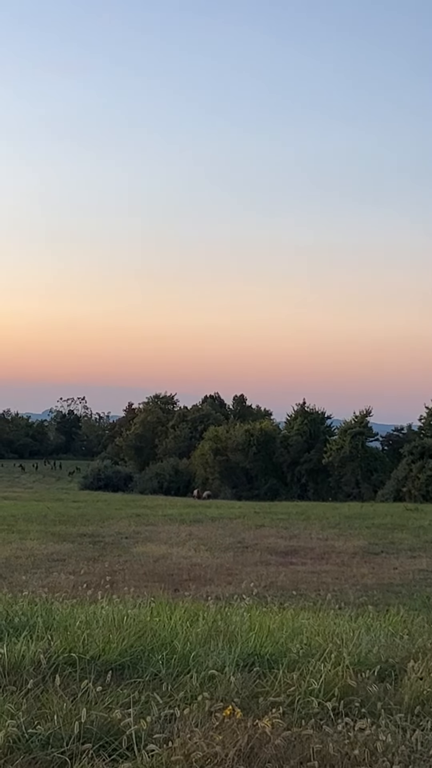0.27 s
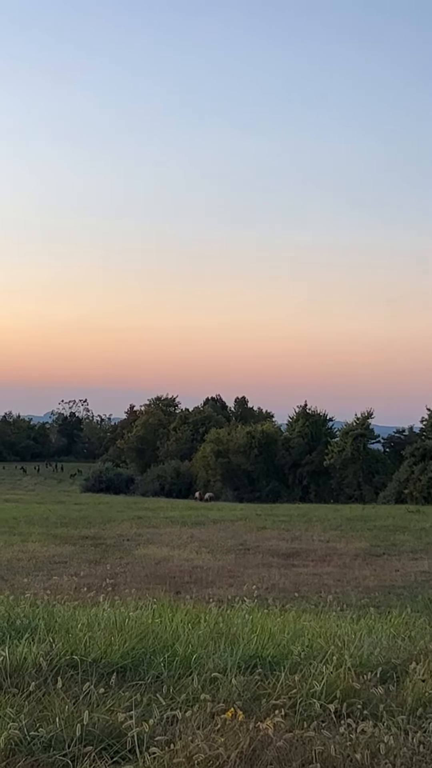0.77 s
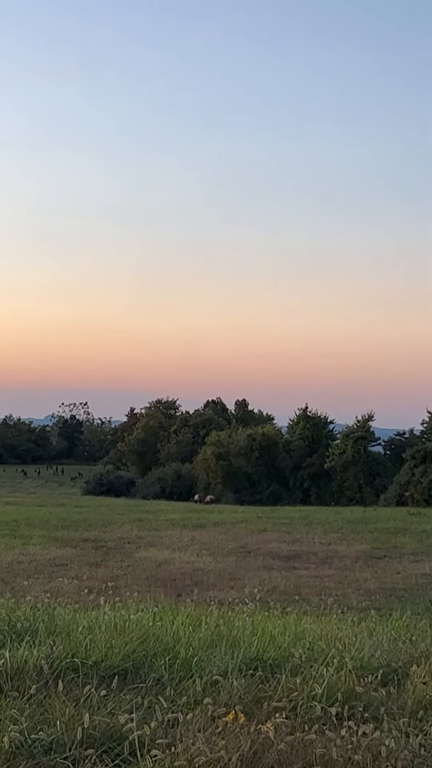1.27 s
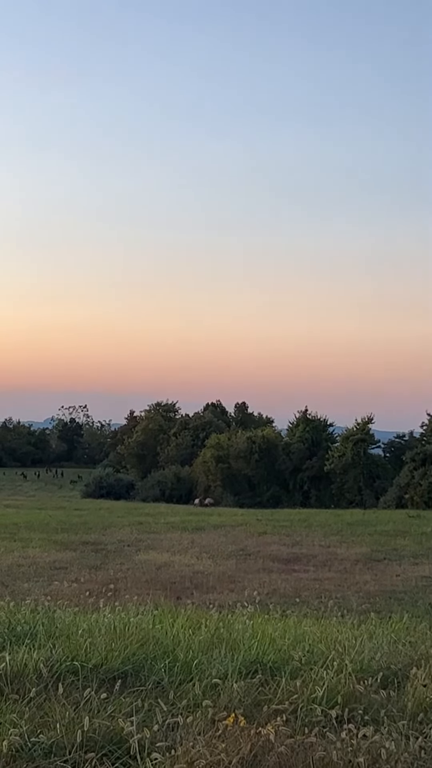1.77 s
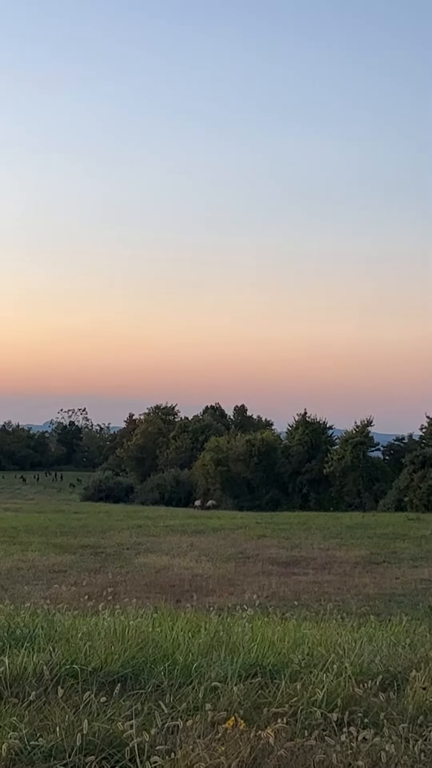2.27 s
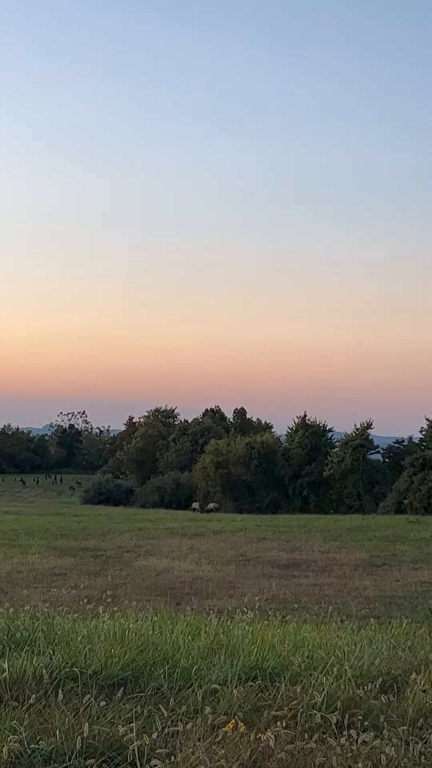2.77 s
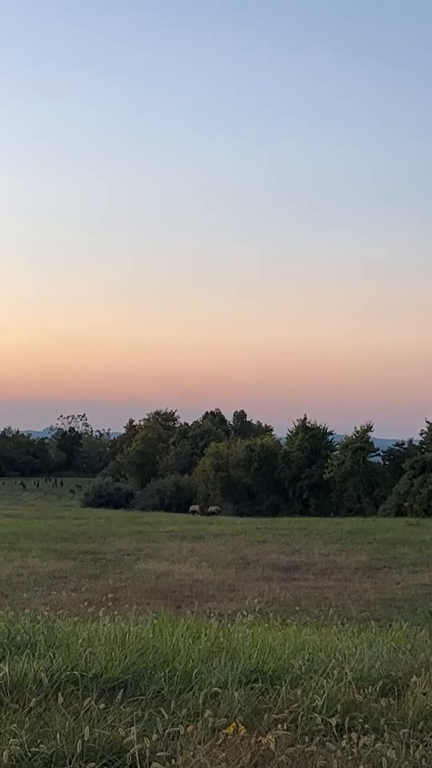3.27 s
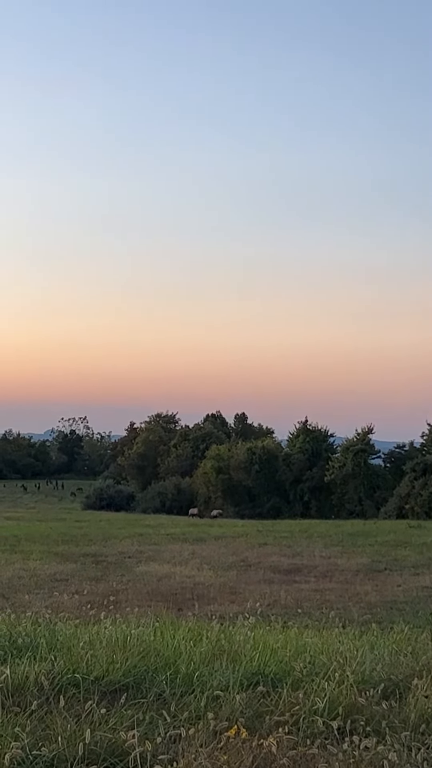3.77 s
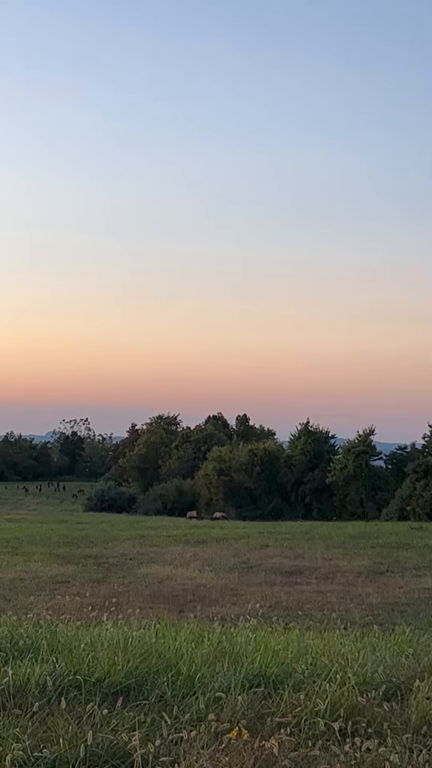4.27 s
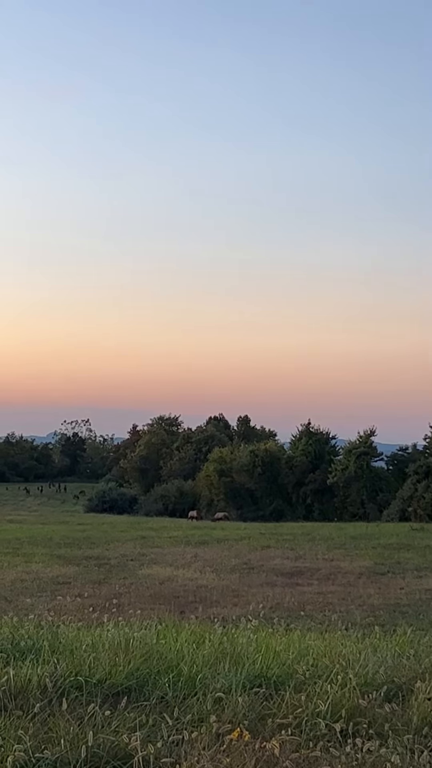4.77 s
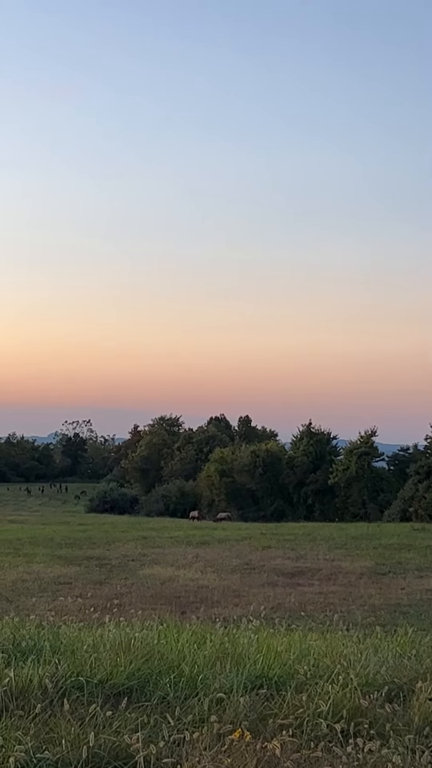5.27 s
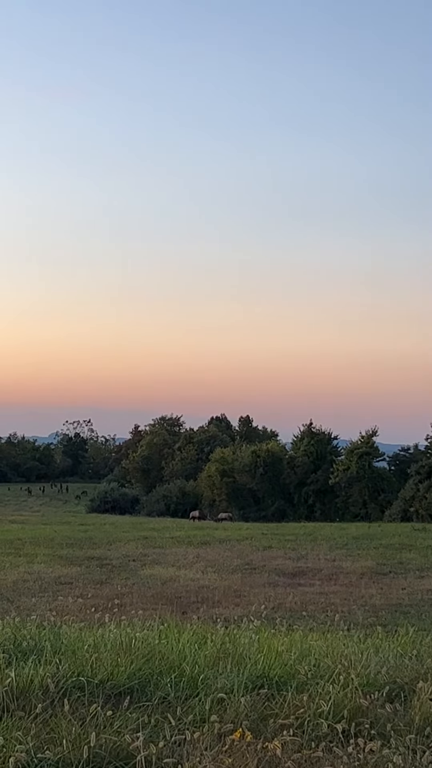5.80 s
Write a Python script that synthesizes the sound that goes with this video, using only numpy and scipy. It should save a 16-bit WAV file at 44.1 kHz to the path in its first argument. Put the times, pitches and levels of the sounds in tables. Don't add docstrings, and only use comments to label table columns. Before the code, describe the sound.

A quiet open field at dusk, heard by a handheld stereo microphone. Steady insects fill the high range, buzzing and throbbing about nineteen times a second, with cricket trill bouts around 4.2 kHz. At 0 s a deep case thump and a cracking antler clack land over hoarse, breathy distant elk calls and short thin whistles. A groan runs to 0.9 s with a brief snort near 0.75, a falling squeal follows at 1.0, then a nasal bellow around 1.3. From 1.7 to 2.5 antlers clatter in woody knocks, strongest near 2.0 and 2.25. A clear whistle rises 2.7-3.2 s. After a lull, a short falling lead-in at 4.1 precedes a louder climbing whistle, 4.3-4.7, flickering in strength, among antler rattles until about 4.9. A faint level whistle lingers from 5.3, with small knocks at 5.5. Dull thuds and finger taps recur, notably 0.6-1.1, 2.3-2.6 and 5.75. Trees return soft echoes.

```python
import sys
import numpy as np
from scipy import signal
from scipy.fft import rfft, irfft, next_fast_len
from scipy.io import wavfile
from scipy.ndimage import uniform_filter1d

SR = 44100
rng = np.random.default_rng(int(sys.argv[2]) if len(sys.argv) > 2 else 0)


def invert_db(level):
    return 10 ** (np.asarray(level, dtype=float) / 20)


def transcribe(signal):
    frames = np.atleast_2d(signal).T
    limited = np.clip(frames, -1, 1)
    pcm = np.round(limited * 32767).astype(np.int16)
    wavfile.write(sys.argv[1], SR, pcm)


N = 266275


def evened(x):
    return x / np.sqrt(np.mean(x ** 2) + 1e-20)


def read(points, hz):
    f, value = np.transpose(points)
    return np.interp(np.log(hz + 1), np.log(f + 1), value)


def played(rows):
    s, *columns = np.transpose(rows)
    t = np.arange(N) / SR
    gate = np.clip(np.minimum(t - s[0], s[-1] - t) / 0.0017, 0, 1)
    return gate, *(np.interp(t, s, c) for c in columns)


def coloured(db):
    hz = np.fft.rfftfreq(N, 1 / SR)
    return evened(irfft(rfft(rng.standard_normal(N)) * invert_db(db(hz)), N))


def resonate(x, hz, width_hz):
    turn = np.exp(2j * np.pi * np.cumsum(hz * np.ones(len(x))) / SR)
    r = np.exp(-np.pi * width_hz / SR)
    return 2 * (turn * signal.lfilter([1 - r], [1, -r], x / turn)).real


def partial(hz, db, rough, width_hz):
    rough = np.clip(rough, 0, 1)
    line = np.sqrt(2) * np.sin(2 * np.pi * np.cumsum(hz) / SR)
    noise = rng.standard_normal(len(hz))
    fuzz = evened(resonate(resonate(noise, hz, width_hz), hz, width_hz))
    return invert_db(db) * (np.sqrt(1 - rough) * line + np.sqrt(rough) * fuzz)


def voice(rows, rough, width_hz, multiples=(1,), overtones_db=(0,), waver_db=0, wobble=0.02):
    gate, hz, db, *mouth_db = played(rows)
    on, out = gate > 0, np.zeros(N)
    for k, rel_db in zip(multiples, overtones_db):
        waver = evened(uniform_filter1d(rng.standard_normal(on.sum()), 2500))
        level_db = db + rel_db + sum(mouth_db) * ((k == 4) - (k == 6))
        pitch_hz = k * hz[on] * (1 + rough * wobble * waver[::-1])
        out[on] += partial(pitch_hz, level_db[on] + waver_db * waver, rough, width_hz)
    return gate * out


def note(s, rise_s, fall_s, hz, db):
    edge_db, sag = -32, 0.011
    return [(s - rise_s, hz * (1 + sag / 2), db + edge_db),
            (s, hz, db),
            (s + fall_s, hz * (1 - sag / 2), db + edge_db)]


# time_s, pitch_hz, effort_db
GROAN = [(0.02, 1060, -90), (0.104, 1040, -80), (0.17, 1050, -61.5), (0.25, 1070, -68.5),
         (0.4, 1040, -62.5), (0.52, 1030, -70), (0.8, 1040, -77), (0.9, 1058, -66.5), (0.94, 1058, -94)]
GROAN_OVERTONES_DB = (-1, -26)


def groan():
    return invert_db(2.5) * voice(GROAN, 0.276, 23, range(1, 3), GROAN_OVERTONES_DB, waver_db=-1.0)


# time_s, pitch_hz, effort_db
SQUEAL = [(.9, 1142, -66), (.94, 1113, -55), (.97, 1041, -47.5), (1.0, 1007, -44), (1.03, 1003, -46.5),
          (1.08, 1028, -52.5), (1.11, 1018, -76), (1.25, 1027, -52)]
SQUEAL_OVERTONES_DB = (-2.5, -2, -26.5)


def squeal():
    return voice(SQUEAL, 0.24, 75, range(1, 4), SQUEAL_OVERTONES_DB, waver_db=3.5)


# time_s, pitch_hz, effort_db, mouth_opening_db (on the fourth partial)
BELLOW = [(1.0, 394, -73, 17), (1.12, 402.2, -63, 8), (1.2, 373.7, -55.5, 7), (1.255, 363.7, -56.5, 3.5),
          (1.31, 352, -44, -1), (1.365, 360.8, -44, -1.5), (1.432, 348, -53.5, -8), (1.46, 367.2, -61, 4),
          (1.52, 360.7, -55, -2), (1.72, 363, -70, 8.5)]
BELLOW_OVERTONES_DB = (-1, -9, 1, -7.5)


def bellow():
    return voice(BELLOW, 0.36, 85, (2, 3, 4, 6), BELLOW_OVERTONES_DB, waver_db=2.1)


# time_s, pitch_hz, level_db
SNORT = [(.72, 2515, -82), (.765, 2470, -51), (.81, 2400, -80)]


def snort():
    return voice(SNORT, rough=0.47, width_hz=730)


# time_s, level_db
RASP = [(0.0, -51.5), (0.714, -58.5), (0.984, -58.5), (1.15, -54), (1.724, -62), (1.9, -86)]
# freq_hz, gain_db
RASP_COLOUR = [(240, -100), (400, -25), (891, -15.5), (1050, -6), (1270, -13.5), (1490, -11), (1730, -11),
               (2120, -6.5), (2530, -14.5), (2620, -55), (2900, -69), (3050, -17), (3900, -34.5),
               (6600, -120)]


def rasp():
    gate, level_db = played(RASP)
    return gate * invert_db(level_db - 6.5) * coloured(lambda hz: read(RASP_COLOUR, hz))


# time_s, pitch_hz, effort_db
GRUNT = [(1.39, 1085, -53), (1.44, 954, -53), (1.49, 775, -62), (1.56, 754, -59)]
# peak_s, rise_s,
# fall_s, pitch_hz, peak_db
MOANS = [(.244, .2, .1, 2380, -61.5), (.3, .05, 1.2, 2370, -69), (.9, .06, .03, 2330, -56.5),
         (1.275, .1, .04, 1060, -44), (.38, .9, .3, 770, -73), (1.48, .22, .14, 620, -57),
         (1.25, .25, .02, 930, -59), (1.0, .02, .3, 930, -69), (4.4, 2.5, 3.0, 2135, -80),
         (4.82, .2, .13, 297, -75), (5.0, .13, .12, 290, -70.5), (.43, .06, .2, 2072, -46),
         (1.03, .08, .12, 1065, -46), (1.06, .1, .04, 1550, -54), (.5, .2, .12, 1480, -61),
         (.72, .1, .08, 1400, -60), (.81, .05, .05, 1490, -60), (.86, .04, .05, 1380, -61),
         (.61, .05, .03, 1250, -60), (4.64, .03, .17, 1960, -47), (1.42, .12, .08, 1090, -48),
         (1.5, .1, .15, 1230, -58), (1.35, .15, .15, 870, -57), (1.53, .08, .1, 900, -56),
         (1.1, .15, .2, 660, -62), (1.05, .1, .15, 1380, -60), (1.64, .04, .05, 1170, -59),
         (.03, .05, .15, 2060, -54), (.85, .3, .1, 2340, -60), (.25, .2, .3, 1500, -63)]


def far_voices():
    calls = [GRUNT] + [note(*row) for row in MOANS]
    return sum(voice(rows, rough=0.42, width_hz=94) for rows in calls)


# time_s, share of the calls that is thinned
HOLLOW = [(0, .25), (.95, .5), (1.15, 1), (1.75, 1), (1.9, 0), (6.04, 0)]


def elk():
    herd = far_voices() + snort() + rasp() + groan() + squeal() + bellow()
    hollow_share = played(HOLLOW)[1]
    notch = signal.iirnotch(1780, 4.5, SR)
    hollowed = signal.filtfilt(*notch, signal.lfilter(*notch, herd))
    return (1 - hollow_share) * herd + hollow_share * hollowed


# time_s, pitch_hz, effort_db
BUGLES = [
    [(2.715, 1740, -76), (2.74, 1795, -55), (2.775, 1813, -47.5), (2.845, 1853, -48.5), (2.91, 1845, -51),
     (3.06, 1867, -44), (3.1, 1867, -46.5), (3.14, 1867, -61), (3.3, 1866, -88)],
    [(4.05, 1890, -78), (4.115, 1805, -60), (4.16, 1760, -62), (4.19, 1750, -74)],
    [(4.292, 1740, -70), (4.317, 1765, -37.5), (4.385, 1845, -44.5), (4.497, 1860, -44.5),
     (4.55, 1965, -37.5), (4.59, 1990, -44), (4.613, 1930, -39), (4.621, 1890, -54), (4.72, 1850, -70)],
    [(5.26, 2110, -87), (5.352, 2084, -64.5), (5.506, 2072, -62.5), (6.038, 2065, -63)],
    [(0.0, 2340, -50), (0.05, 2403, -61.5), (0.13, 2450, -53), (0.15, 2410, -66), (0.2, 2330, -89)],
    [(.372, 2024, -82), (.385, 1997, -55.5), (.45, 2000, -56), (.482, 1975, -56), (.5, 2010, -81),
     (.55, 2010, -74)],
]
# time_s, depth_db, half_width_s
FADES = [(2.805, 24, .013), (2.815, 8, .03), (2.945, 7, .025), (4.346, 4, .008), (4.362, 4, .007),
         (4.377, 9, .007), (4.39, 14, .009), (4.423, 12, .012), (4.45, 6, .016), (4.497, 3, .012),
         (4.527, 8, .014), (4.561, 3, .007), (4.58, 5, .014), (5.46, 10, .06), (5.742, 8, .04),
         (5.946, 25, .065)]
# peak_s, rise_s, fall_s, pitch_hz, peak_db
PIPES = [(.212, .07, .07, 2234, -56.5), (.488, .2, .04, 2226, -60), (.736, .3, .12, 2200, -61.5),
         (.392, .02, .1, 1935, -56), (.7, .2, .2, 2075, -63), (.68, .06, .04, 1160, -62),
         (.72, .02, .02, 1060, -60), (.47, .15, .1, 750, -66), (.606, .015, .3, 2025, -60.5),
         (4.992, .18, .05, 948, -69.5), (5.564, .02, .04, 1345, -57.5)]


def whistles():
    t = np.arange(N) / SR
    fade_db = sum(db * np.maximum(1 - abs(t - s) / half_s, 0) for s, db, half_s in FADES)
    bugles = sum(voice(rows, rough=0.02, width_hz=90) for rows in BUGLES)
    pipes = sum(voice(note(*row), rough=0.08, width_hz=140) for row in PIPES)
    return bugles / invert_db(fade_db) + pipes


# freq_hz, width_hz, gain_db
ANTLER = [(805, 840, -4), (1127, 410, -3.5), (1778, 480, -3.5)]


def bone(x):
    return sum(invert_db(g) * resonate(resonate(x, f, w), f, 2 * w) for f, w, g in ANTLER)


# freq_hz, width_hz, gain_db
CRACK = [(3050, 890, 18), (4200, 2700, 8)]
# start_s, peak_db, ring_hz, brightness_db, chatter_t60_s
BLOWS = [(0.0435, -27.5, 1340, -17.5, 0.057), (0.052, -36, 1030, -31, 0.048),
         (0.072, -36, 1220, -23.5, 0.084), (0.107, -41, 1390, -20, 0.037), (0.116, -41.5, 1280, -26, 0.046),
         (1.721, -44, 1100, -28, 0.094), (1.729, -44, 1294, -25, 0.1), (1.914, -38.5, 1115, -18.5, 0.073),
         (1.926, -31, 860, -38, 0.053), (1.939, -41, 920, -34, 0.24), (1.961, -42, 1130, -30, 0.12),
         (1.992, -38, 1220, -35, 0.021), (1.997, -37.5, 850, -22, 0.039), (2.016, -48, 980, -25, 0.11),
         (2.035, -35.5, 1010, -31, 0.018), (2.038, -28.5, 1103, -19.5, 0.076),
         (2.056, -40, 1130, -20, 0.032), (2.064, -38, 1080, -35, 0.088), (2.08, -46, 1120, -31, 0.061),
         (2.142, -46.5, 1020, -34, 0.055), (2.153, -47.5, 980, -26, 0.19), (2.178, -51, 1160, -23, 0.069),
         (2.186, -43, 1120, -37, 0.13), (2.238, -39, 1310, -10, 0.019), (2.24, -26.5, 970, -55, 0.031),
         (2.2505, -26.5, 1150, -70, 0.0071), (2.254, -38, 780, -63, 0.06), (2.268, -52, 1200, -30, 0.037),
         (2.33, -63, 770, -8, 0.095), (2.42, -56, 890, -17, 0.29), (2.442, -53.5, 726, -18, 0.25),
         (3.806, -63.5, 990, -17, 0.083), (3.865, -61.5, 1160, -29, 0.055),
          (3.968, -59.5, 880, -32, 0.035), (4.11, -58, 1150, -39, 0.062), (4.202, -48.5, 1150, -26, 0.11),
          (4.228, -50.5, 846, -22, 0.18), (4.262, -50, 930, -6.5, 0.045), (4.266, -44.5, 1220, -23, 0.031),
          (4.334, -42, 1150, -8.5, 0.081), (4.371, -45.5, 1340, -27, 0.087), (4.435, -45, 1290, -35, 0.1),
          (4.488, -52, 824, -30, 0.072), (4.516, -46.5, 845, -33, 0.066), (4.589, -67, 818, -28, .06),
          (4.609, -46, 1210, -26, 0.049), (4.614, -49.5, 845, -34, 0.15), (4.632, -37.5, 920, -33, 0.16),
          (4.646, -46.5, 1530, -12, 0.012), (4.652, -38.5, 1200, -21.5, 0.048),
          (4.669, -63, 1500, -28, 0.031), (4.738, -45, 993, -22, 0.036), (4.744, -48.5, 870, -39, 0.16),
          (4.757, -62, 1190, -28, .05), (4.79, -50, 1080, -13, 0.057), (4.796, -47, 1020, -32, 0.065),
          (4.833, -51, 970, -27, 0.074), (4.841, -48, 990, -36, 0.041), (5.5, -56, 1160, -20, 0.12),
          (5.518, -54, 1170, -18, 0.063), (5.552, -51.5, 1310, -12.5, 0.23)]


def antler_blows():
    knock_rise_s, crack_t60_s = 0.0027, 0.036
    out, t = np.zeros(N + 6000), np.arange(6000) / SR
    for s, db, hz, bright_db, t60_s in BLOWS:
        size, chance, hiss = rng.random((3, 6000)) - 0.5
        knocks = np.sign(size) * (0.5 + abs(size)) * (chance < 2500 / SR - 0.5)
        knocks[:30:12] = 2.2
        chatter = knocks * np.minimum(t / knock_rise_s + 0.33, 1) * invert_db(-60 * t / max(t60_s, 0.005))
        edge = (knocks + 7.8 * hiss) * invert_db(-60 * t / crack_t60_s)
        ring = 2.2 * resonate(resonate(chatter, hz, 190), hz, 910) + bone(chatter)
        ring = signal.lfilter(*signal.butter(2, 1900, fs=SR), ring)
        crack = sum(invert_db(g) * resonate(resonate(edge, f, w), f, w) for f, w, g in CRACK)
        blow = ring / abs(ring).max() + invert_db(bright_db + 13.0) * crack / abs(crack).max()
        out[round(s * SR):][:6000] += invert_db(db) * blow
    return out[:N]


# peak_s, rise_s, fall_s, peak_db
RATTLE = [
    (1.93, 0.043, 0.2, -73),
    (2.087, 0.13, 0.06, -58),
    (2.304, 0.73, 0.83, -64),
    (4.347, 0.6, 0.4, -57.5),
    (4.638, 0.085, 0.37, -51.5),
    (5.686, 0.28, 0.23, -71),
]


def antler_rattle():
    knocks = rng.standard_normal(N) * (rng.random(N) < 700 / SR)
    loose, out = evened(bone(knocks)), np.zeros(N)
    for s, rise_s, fall_s, peak_db in RATTLE:
        gate, _, db = played(note(s, rise_s, fall_s, 0, peak_db))
        out += gate * invert_db(db - 3.0) * loose
    return out


def antlers():
    band = signal.butter(4, [580, 5400], "band", fs=SR, output="sos")
    return signal.sosfilt(band, antler_blows() + antler_rattle())


def tree_line(x):
    t = np.arange(SR // 2) / SR
    hits = rng.standard_normal(len(t)) * (rng.random(len(t)) < 500 / SR)
    echoes = hits * invert_db(-60 * t / 0.67) * (t > 0.012)
    dull = signal.lfilter([0.35], [1, -0.65], x)
    return signal.fftconvolve(dull, echoes / np.linalg.norm(echoes))[:N]


# time_s, factor on the throb depth
IN_STEP = [(0, .4), (1.2, .6), (3.0, 1.6), (4.1, .8), (6.04, 1.0)]


def choir(db, low_hz, peak_hz, high_hz, rate_hz, first_s, depth_db):
    corners_hz = [0, low_hz - 450, low_hz, peak_hz, high_hz, high_hz + 750, SR / 2]
    gains_db = [-99.0, -52.0, -5.5, 3.5, -2.0, -47, -150]
    band = coloured(lambda hz: np.interp(hz, corners_hz, gains_db))
    beat = np.cos(2 * np.pi * rate_hz * (np.arange(N) / SR - first_s))
    drift = evened(uniform_filter1d(rng.standard_normal(N), 1200))
    return invert_db(db + 1.68 * drift + depth_db * played(IN_STEP)[1] * beat) * band


# low_hz, peak_hz, high_hz, throb_rate_hz, first_throb_s, throb_depth_db
CHOIRS = [
    (5600, 5960, 6350, 19.1, .024, 2.6),
    (4420, 4980, 6800, 61.0, .0, 1.3),
    (10950, 11600, 12250, 19.02, .012, 2.8),
    (12300, 15200, 17500, 19.35, .025, 2.4),
    (8950, 9250, 13000, 19.0, .0, .6),
    (3750, 4150, 4250, 38.0, .0, 1.5),
    (7150, 7280, 7350, 9.5, .0, 5),
]
CHOIR_DB = [-55.5, -58, -75, -77.5, -84.5, -69, -88]
# time_s, gain_db
HIGH_SWELL = [(0, 6.5), (4.4, 3), (4.9, 9), (6.04, 9)]
# time_s, gain_db
THIN_SWELL = [(0, 1), (2.3, 3), (4.2, 4.5), (4.4, 7.5), (6.04, 8)]


def insects():
    choirs = [choir(db, *row) for db, row in zip(CHOIR_DB, CHOIRS)]
    highest = choirs[3] * invert_db(played(HIGH_SWELL)[1])
    thin = choirs[4] * invert_db(played(THIN_SWELL)[1])
    return sum(choirs[:3] + choirs[5:]) + highest + thin


# start_s, end_s, pitch_hz, level_db
CRICKET = [
    (.1, 0.333, 4200, -67.5),
    (0.624, 0.95, 4182, -62),
    (1.399, 1.751, 4254, -64),
    (1.8, 2.266, 4200, -74),
    (2.58, 3.074, 4170, -65.5),
    (3.1, 3.528, 4200, -72),
    (3.552, 3.883, 4216, -64.5),
    (4.854, 5.347, 4193, -63),
]


def cricket():
    pulses = evened(1 + 0.35 * np.sin(2 * np.pi * 38.2 * np.arange(N) / SR))
    out = np.zeros(N)
    for start_s, end_s, hz, db in CRICKET:
        bout = [(start_s - 0.04, hz, db - 7), (start_s + 0.08, hz, db - 1),
                (end_s - 0.06, hz + 25, db), (end_s + 0.03, hz + 25, db - 9)]
        out += voice(bout, rough=0.7, width_hz=110, wobble=0.002)
    return pulses * out


# peak_s, peak_db, hold_s, scuff_db (against the thud)
BUMPS = [(0.0, -26, 0, -46), (0.174, -53.5, 0, -34), (0.662, -52.5, 0.1, -17.5),
         (0.837, -48.5, 0.0054, -30), (0.916, -50, 0.025, -10), (1.061, -45, 0.0088, -19),
         (1.392, -59.5, 0, -41), (1.568, -64, 0.049, -10.5), (1.864, -63, 0.0085, -25),
         (1.942, -74.5, 0.13, 6.5), (2.309, -50, 0.0046, -11.5), (2.42, -48, 0.0036, -26),
         (2.518, -51.5, 0.013, -10), (2.658, -54, 0, -32), (3.137, -47, 0, -20), (3.2, -63.5, 0.066, -32),
         (3.482, -62.5, 0.0094, -11), (3.8, -58.5, 0, -10), (4.198, -66, 0.014, -19),
         (5.02, -64, 0.16, -20), (5.285, -61.5, 0.09, -25), (5.516, -61.5, 0.092, -7),
         (5.728, -38, 0.12, -37), (5.939, -48.5, 0, -39), (6.03, -57, 0, -33)]
# freq_hz, gain_db
BUMP_COLOUR = [(20, -50), (33, -5), (52, 4), (75, -1), (110, -6.5), (160, -29.5), (250, -57.5), (700, -120)]
# freq_hz, gain_db
SCUFF_COLOUR = [(90, -25), (140, 5.5), (200, -13.5), (350, -19), (500, -60), (1500, -110)]
# time_s, level_db
BREEZE = [(0, -59), (.5, -72), (1.3, -73), (2.2, -72.5), (2.75, -78), (3.3, -68), (4.3, -69.5),
          (5.2, -64.5), (6.04, -78)]


def bumps():
    rise_db_s, fall_db_s, breeze_scuff_db = 232, 348, -8.5
    t, breeze = np.arange(N) / SR, invert_db(played(BREEZE)[1])
    push, rub = breeze ** 2, (invert_db(breeze_scuff_db) * breeze) ** 2
    for s, db, hold_s, scuff_db in BUMPS:
        before_db = rise_db_s * np.maximum(s - t, 0)
        after_db = fall_db_s * np.maximum(t - s - hold_s, 0)
        power = invert_db(db - before_db - after_db) ** 2
        push = push + power
        rub = rub + invert_db(scuff_db) ** 2 * power
    thud = coloured(lambda hz: read(BUMP_COLOUR, hz))
    thud = thud / np.sqrt(uniform_filter1d(thud ** 2, 1500) + 0.36)
    scuff = coloured(lambda hz: read(SCUFF_COLOUR, hz))
    bass_cut = signal.butter(2, 36, "high", fs=SR)
    thud = signal.lfilter(*bass_cut, np.minimum(t / 0.004, 1) * np.sqrt(push) * thud)
    return thud + np.sqrt(rub) * scuff


# start_s, peak_db, first_swing_hz, t60_s
TAPS = [(.63, -49, 127, 0.16), (.745, -57, 259, 0.13), (0.798, -39, 130, 0.064), (0.829, -39.5, 178, 0.12),
        (0.894, -54, 408, 0.036), (.95, -66, 335, 0.033), (1.051, -43, 164, 0.13),
        (1.076, -43.5, 152, 0.13), (1.998, -80, 264, 0.14), (2.29, -50, 225, 0.15),
        (2.378, -54.5, 168, 0.1), (2.414, -51, 172, 0.095), (2.449, -50, 133, 0.088),
        (2.499, -45.5, 250, 0.18), (2.631, -51.5, 177, 0.078), (3.13, -64, 129, 0.059),
        (5.799, -41.5, 177, 0.1)]


def taps():
    sink_s, rest = 0.018, 0.18
    out, t = np.zeros(N + 8000), np.arange(8000) / SR
    for s, db, hz, t60_s in TAPS:
        cycles = hz * (rest * t + (1 - rest) * sink_s * (1 - np.exp(-t / sink_s)))
        level = invert_db(db + 6.5 - 60 * t / max(t60_s, 0.02)) * np.minimum(t / 0.012, 1)
        out[round(s * SR):][:8000] += level * np.sin(2 * np.pi * cycles)
    return out[:N]


# freq_hz, level_db
AIR = [(100, -101.5), (200, -102.5), (500, -107), (1200, -109), (1800, -113), (2150, -110), (2500, -121),
       (3400, -124), (7000, -140), (16000, -145)]
# freq_hz, share
AIR_SAME = [(100, 1), (350, 0.25), (600, 0.17), (1400, 0.044), (2000, 0.32)]
# time_s, gain_db
AIR_SWELL = [(0, 0), (2.5, 1), (3.2, -1.5), (3.8, -3.5), (4.2, 2.5), (5.1, -0.5), (6.04, -3)]


def air():
    hz = np.fft.rfftfreq(N, 1 / SR)
    a, b = rfft(rng.standard_normal((2, N)))
    same = np.clip(read(AIR_SAME, hz), 0, 1)
    pair = np.array([a, same * a + np.sqrt(1 - same ** 2) * b])
    wash = irfft(pair * invert_db(read(AIR, hz)) * np.sqrt(SR / 2), N)
    return invert_db(played(AIR_SWELL)[1]) * wash


def scene():
    high, calls, blows = whistles(), elk(), antlers()
    echo = tree_line(invert_db(-8.5) * calls + invert_db(-13.5) * blows) + tree_line(invert_db(-25) * high)
    heard = high + calls + blows + echo + insects() + cricket() + bumps() + taps()
    stray = invert_db(-38) * insects() + invert_db(-18.0) * bumps() + invert_db(-14.5) * taps()
    return heard + np.array([stray, -stray]) + air()


# freq_hz, phase_rad
PORT_TURN = [(0, 0), (550, .5), (1400, .35), (1900, -.85), (2700, -2.5), (3700, -.85), (4500, -1.4),
             (5050, -1.36), (5700, -3.06), (5860, -3.14), (6030, -3.27), (6200, -3.45), (6900, -4.55),
             (7300, -5.8), (8900, -7.5), (9300, -8.85), (9750, -9.4), (10600, -9.5), (11900, -12.2),
             (12950, -12.7), (13600, -14.0), (14450, -15.6), (15050, -15.8), (15700, -16.9)]
# freq_hz, balance_db
PORT_BALANCE = [(250, 0), (600, -2.5), (1000, -2), (1400, 0.5), (1800, 4.5), (2000, 4), (2250, -1.5),
                (2600, 0.5), (4000, 0)]


def microphone_ports(dry):
    size = next_fast_len(N + 4096)
    hz = np.fft.rfftfreq(size, 1 / SR)
    turn = np.exp(1j * np.interp(hz, *np.transpose(PORT_TURN)))
    tilt = invert_db(read(PORT_BALANCE, hz) / 2)
    return irfft(rfft(dry, size) * np.array([tilt, turn / tilt]), size)[:, :N]


def low_pass(x):
    return signal.sosfilt(signal.butter(12, 15760, fs=SR, output="sos"), x)


def record(dry):
    mix = microphone_ports(dry)
    return low_pass(mix)


dry = scene()
out = record(dry)
transcribe(out)
```